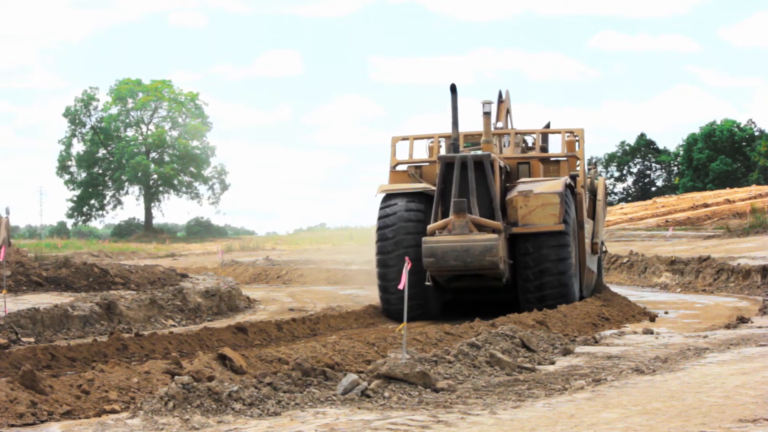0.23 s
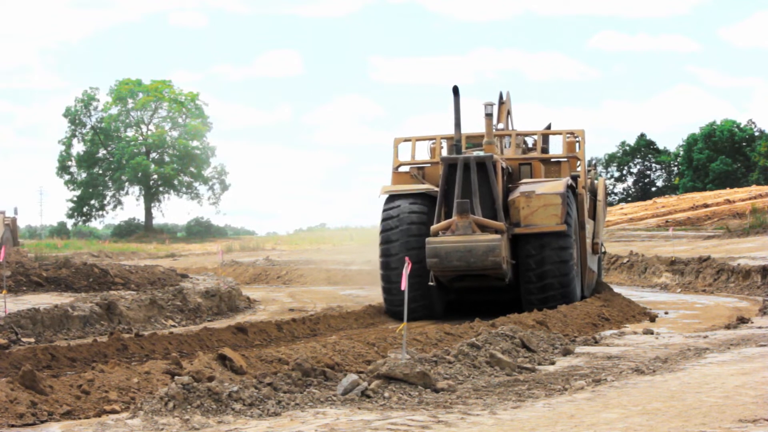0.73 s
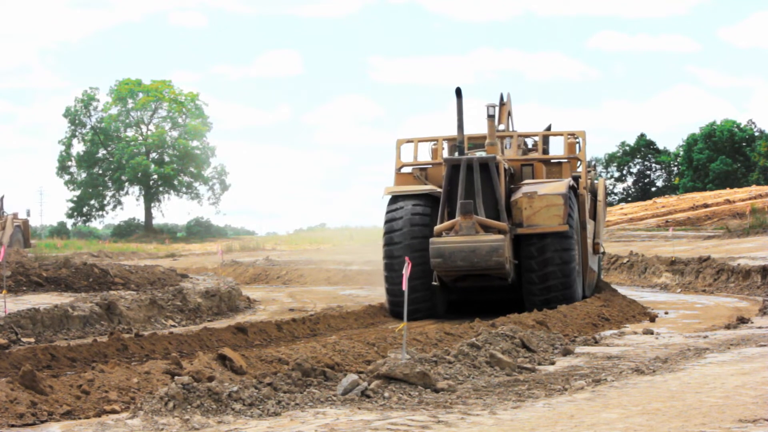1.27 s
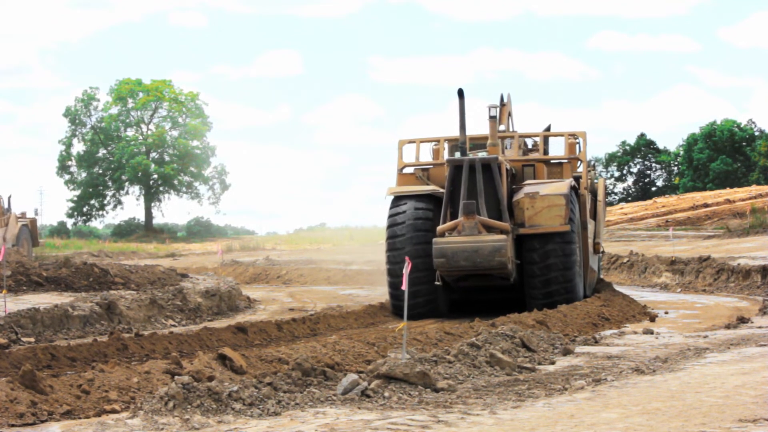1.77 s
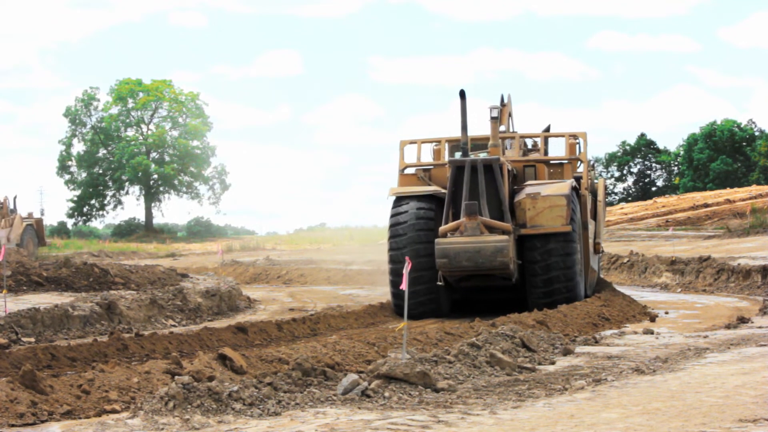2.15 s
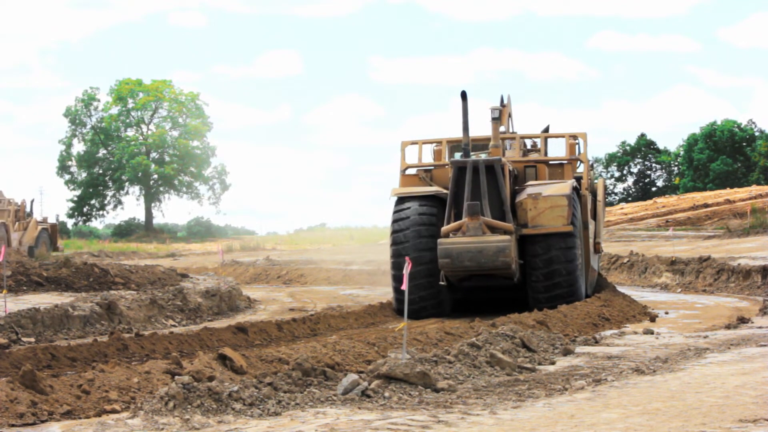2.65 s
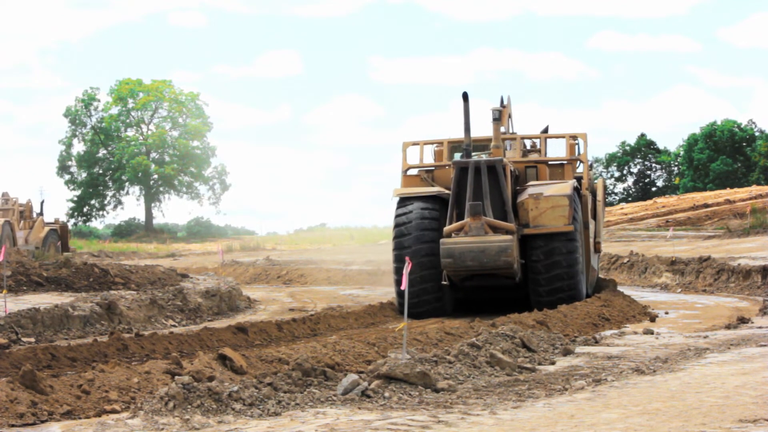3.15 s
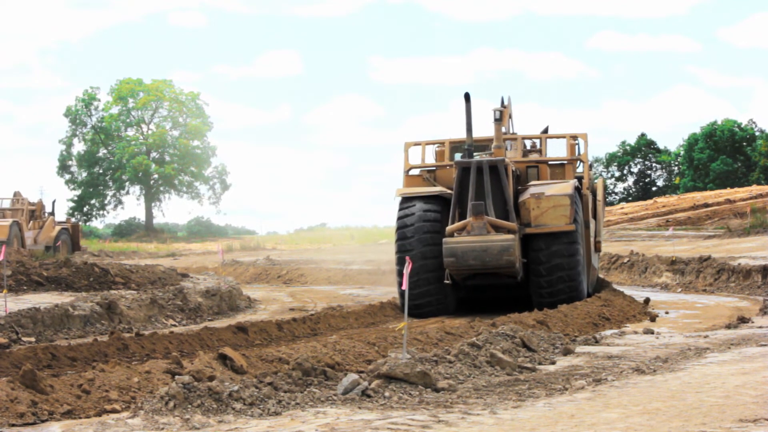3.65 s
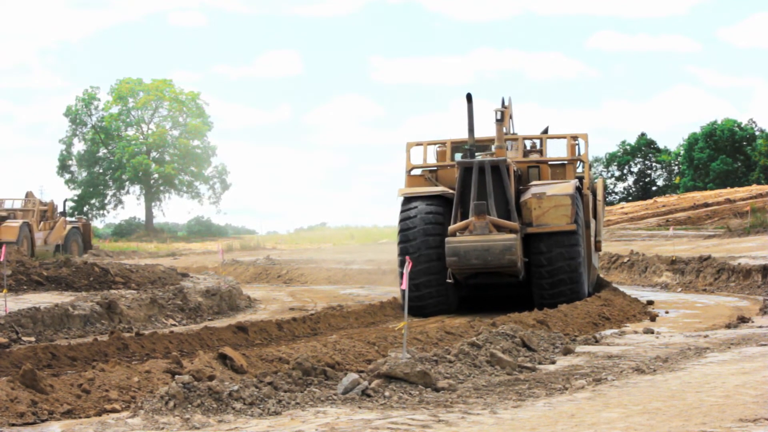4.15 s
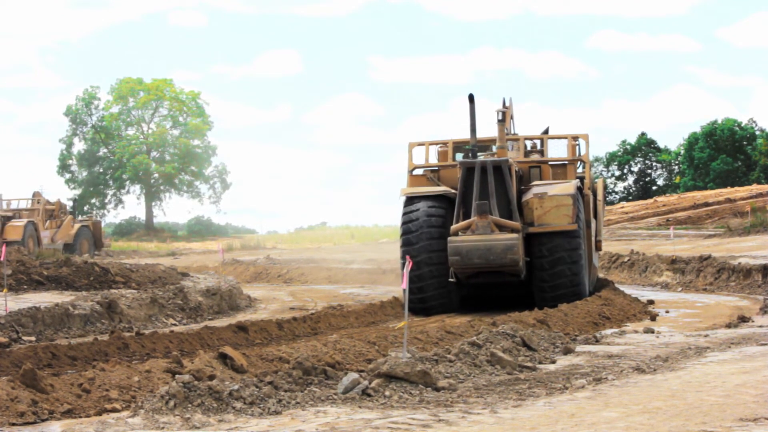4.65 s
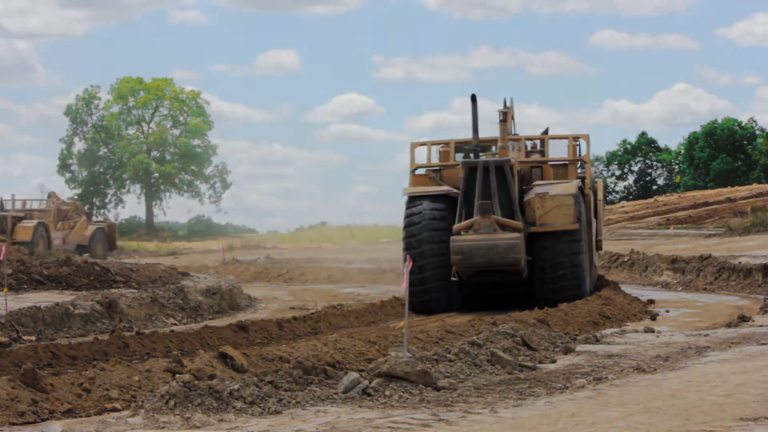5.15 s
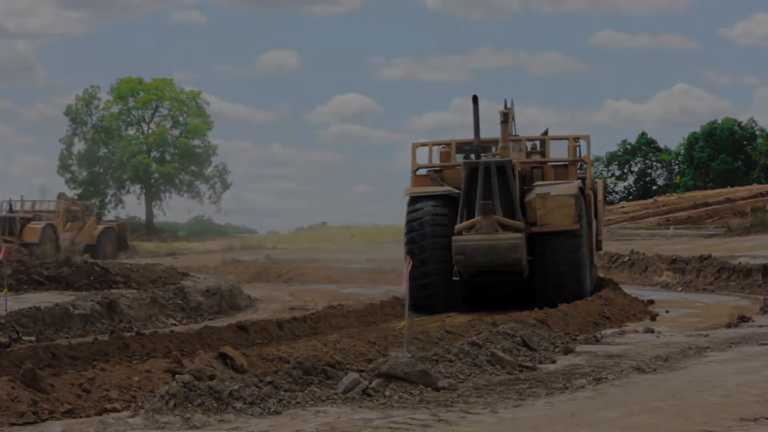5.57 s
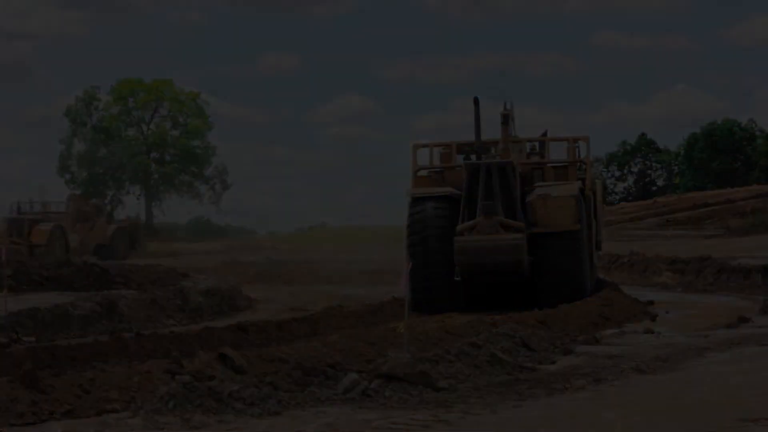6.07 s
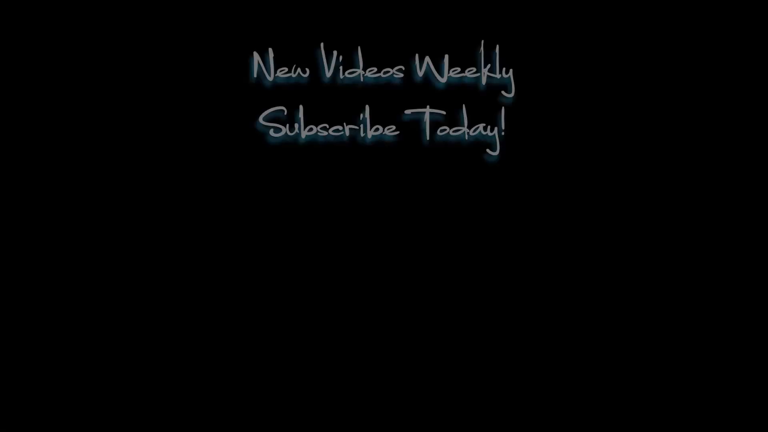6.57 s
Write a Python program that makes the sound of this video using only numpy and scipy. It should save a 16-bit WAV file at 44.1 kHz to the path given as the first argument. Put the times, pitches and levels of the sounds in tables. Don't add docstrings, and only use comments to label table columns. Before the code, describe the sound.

From 0 s a big diesel earthmover is already running at steady speed about twenty metres away in the open. A firm drone near 200 Hz carries rapid knocks, roughly seventeen a second, with mechanical valve rattle and a broad roar of fan, intake and tyres. Over it, bright gritty gas hiss flutters in uneven puffs, slightly hollow from ground reflection, brightening in short gusts, notably around 0.4, 1.3, 2.7 and 4.2 s. The drone swells briefly near 2 s. Further off, another engine's note sinks until about 2.3 s, climbs to about 3.9 s, dips near 5 s, then rises again; a third grumbles unsteadily behind. Around 3 s the roar and hiss ease slightly. From 4.6 s everything fades evenly together, engines still running, reaching silence near 6.4 s and remaining silent. The sound is mono, dense and slightly softened by the camera microphone.

```python
import sys
import numpy as np
from scipy import signal
from scipy.fft import rfft, irfft, next_fast_len
from scipy.io import wavfile
from scipy.ndimage import uniform_filter1d, map_coordinates

SR = 44100
rng = np.random.default_rng(int(sys.argv[2]) if len(sys.argv) > 2 else 0)


def file_out(sig):
    cols = np.atleast_2d(sig).T
    lim = np.clip(cols, -1, 1)
    pcm = np.round(lim * 32767).astype(np.int16)
    wavfile.write(sys.argv[1], SR, pcm)


def invert_db(x):
    u = np.asarray(x, float) / 20
    return 10 ** u


N = 300843
T = np.arange(N) / SR

# (time [s], gain [dB])
AIR = [(0, -1), (1.7, -1), (2.6, 3.5), (2.9, -1.5), (3.3, -0.4), (3.5, -3), (4.05, -2), (4.25, 5),
       (4.8, -1.5), (5.2, -1), (6.05, 2.5), (6.35, -0.5)]
BODY_SHARE, EDGE_SHARE = .15, .5


def level(x, db):
    return x * invert_db(db) / np.sqrt(np.mean(x ** 2))


def read(table):
    s, *columns = np.transpose(table)
    return [np.interp(T, s, c) for c in columns]


def walk(rate):
    hold = int(SR / rate)
    steps = np.repeat(rng.standard_normal(N // hold + 1), hold)
    smooth = uniform_filter1d(uniform_filter1d(steps, hold), hold)[:N]
    return smooth / smooth.std()


def colour(x, table):
    hz, db = np.transpose(table)
    size = next_fast_len(N)
    log_hz = np.log(np.fft.rfftfreq(size, 1 / SR) + 1)
    gain_db = np.interp(log_hz, np.log(hz), db, left=-60, right=-60)
    return irfft(rfft(x, size) * invert_db(gain_db), size)[:N]


def band(x, lo_hz, hi_hz):
    return signal.sosfilt(signal.butter(2, [lo_hz, hi_hz], "bandpass", fs=SR, output="sos"), x)


def lowpass(x, hz, order):
    return signal.sosfiltfilt(signal.butter(order, hz, fs=SR, output="sos"), x)


def air():
    # (time [s], half length [s], gain [dB])
    gusts = [(0.106, .06, 4), (0.427, .07, 7), (.58, .03, 4), (0.695, .05, 3), (0.947, .07, 3),
             (1.3, .04, 7.5), (1.49, .04, 4.5), (1.637, .05, 3), (1.962, .07, 3), (2.523, .05, 2.5),
             (2.728, .04, 4.5), (3.08, .06, 3.5), (3.33, .04, 1), (3.95, .06, 1.5), (4.687, .05, 2.5),
             (4.957, .05, 6), (5.235, .04, 4), (5.468, .05, 2), (5.63, .04, 1.5), (5.861, .05, 2.5)]
    return read(AIR)[0] + sum(db * np.exp(-.5 * ((T - s) / half) ** 2) for s, half, db in gusts)


def turned():
    return np.interp(T, (3, 3.05), (0, 1))


def engine_turns():
    # (time [s], speed [cycles/s])
    speed = [(.25, 16.823), (1.5, 16.832), (2.75, 16.862), (3.75, 16.834), (4.75, 16.812), (6.3, 16.815)]
    knock_turn = .238
    return np.cumsum(read(speed)[0]) / SR - knock_turn


def exhaust(turns, scatter=.095, lead=.07, lag=.55, breathe_db=.7):
    # (multiple of the cycle rate [-], level [dB rms])
    orders = [(6, -30.8), (10, -47.0), (12, -22.1), (13, -41.3), (14, -35.4), (15, -42.2), (16, -40.4),
              (17, -41.2), (18, -42.3), (19, -40.1), (20, -42.2), (22, -46.5), (23, -43.6), (24, -40.6),
              (25, -43.0), (26, -40.7), (27, -41.5), (29, -40.2), (30, -40.2), (31, -46.9), (32, -40.1),
              (33, -37.7), (35, -38.2), (36, -46.0), (47, -44.5), (48, -44.5), (49, -45.7), (51, -46.3),
              (53, -47.1), (54, -43.7),
              (4, -47.5), (38, -49), (41, -48), (57, -47), (60, -47.5), (66, -47.5), (68, -48), (73, -51),
             (88, -51), (110, -46.5)]
    # (time [s], level [dB rms])
    drone = [(0, -22), (1.15, -23), (1.32, -21), (1.6, -23.5), (1.98, -19), (2.2, -23.5), (2.45, -21),
             (3.2, -21), (6.3, -21.5)]
    pipe_order = 12
    out = 0
    for k, db in orders:
        if k > pipe_order:
            off = lead + scatter * max(1, k / 36) ** 4 * rng.standard_normal()
            off -= lag * np.exp(-(k - pipe_order) / 2.5)
        else:
            off = lead - .27 * (k < pipe_order)
        if k == pipe_order:
            db = read(drone)[0] - .6
        out = out + invert_db(db + breathe_db * walk(4)) * np.cos(2 * np.pi * (round(k) * turns + off))
    return np.sqrt(2) * out


def clatter(turns):
    size = 2048
    rattle = np.interp(turns % 1 * size, np.arange(size + 1), rng.standard_normal(size + 1))
    return level(band(rattle, 950, 2400), -37.5)


def puffs(turns, start=0.028, decay=0.44, uneven_db=1.5):
    puff_sizes = [1.5, 1.2, 3.8, 3.4, 1, 3.6]
    firing = (turns - start) * len(puff_sizes)
    n = np.floor(firing).astype(int)
    uneven = uneven_db * rng.standard_normal(n.max() + 9)[n + 8]
    size = np.array(puff_sizes)[n % len(puff_sizes)] + uneven
    return uniform_filter1d(size * np.exp(-(firing % 1) / decay), size=60)


def roar(puff_db, depth=0.3):
    # (frequency [Hz], level [dB per Hz])
    roar_tone = [(25, -34), (45, -16), (70, -11.5), (90, -8), (115, -2.7), (200, -3), (300, -4), (450, -9),
                 (580, -6), (660, -10), (800, -9), (1100, -8), (2000, -11), (3200, -16)]
    swell = .3 * walk(1.5)
    bands = 0
    for lo_hz in 20 * 2. ** np.arange(0, 8, .5):
        noise = band(rng.standard_normal(N), lo_hz, np.sqrt(2) * lo_hz)
        bands = bands + noise * invert_db(swell + .7 * walk(12))
    sag_db = -1.23 * turned()
    return level(colour(bands, roar_tone) * invert_db(depth * puff_db + sag_db), -24)


def grumble(flutter_db=3.0):
    # (frequency [Hz], width [Hz], level [dB rms])
    tones = [(118.8, 8.8, -41), (147.6, 3.5, -39), (170.5, 6, -37), (208.1, 21, -37)]
    out = 0
    for hz, width_hz, db in tones:
        phase = np.cumsum(hz + width_hz / 2 * walk(10)) / SR
        out = out + np.sqrt(2) * invert_db(db + flutter_db * walk(9)) * np.sin(2 * np.pi * phase)
    return out


def gas_noise(ticks_per_s=900, tick_db=-8):
    # (frequency [Hz], level [dB per Hz])
    treble = [(1530, -23.5), (2600, -5), (3300, 0.5), (4700, -2.5), (6000, -7), (7080, -13.5),
              (8340, -10.5), (9300, -21.5), (10400, -30), (12500, -35.5), (13700, -43.5), (14500, -35.5),
              (15200, -44.5), (15800, -52.5)]
    sizes = rng.standard_normal(N) * invert_db(3 * np.minimum(rng.exponential(size=N), 3))
    ticks = (rng.random(N) < ticks_per_s / SR) * sizes
    return colour(rng.standard_normal(N) + level(band(ticks, 9500, 17000), tick_db), treble)


def ground_echo(noise):
    spacing_hz = 1771 + 57 * T
    late = map_coordinates(noise, [np.arange(N) - SR / spacing_hz], order=3)
    late = lowpass(late, 9500, 2)
    share = .3 + .04 * read(AIR)[0]
    share = share * invert_db(2 * walk(4.1))
    return (noise - np.clip(share, 0, .9) * late) / np.sqrt(1 + share ** 2)


def hiss(puff_db, top_depth=1.4):
    air_db = air()
    top_db = -37.5 + air_db
    body_db = -31.0 + BODY_SHARE * air_db - 1.3 * turned()
    noise = ground_echo(gas_noise())
    low = lowpass(noise, 5800, 3)
    body = level(low * invert_db(0.89 * puff_db + 0.43 * walk(14)), 1.0)
    top = level((noise - low) * invert_db(top_depth * puff_db + .6 * walk(25)), .3)
    deep = lowpass(body, 3900, 2)
    edge_db = (EDGE_SHARE - BODY_SHARE) * air_db + .7 * walk(9)
    body = deep + (body - deep) * invert_db(edge_db)
    return body * invert_db(body_db) + top * invert_db(top_db)


def far_machine(wobble_hz=1.2, flutter_db=1.7):
    # (time [s], exhaust note [Hz])
    revs = [(0, 296), (.2, 296), (.4, 286), (.62, 295), (.95, 277), (1.15, 275), (1.4, 257), (1.7, 252),
            (2.3, 236), (2.9, 244), (3.25, 258), (3.45, 268), (3.9, 273), (4.35, 267), (4.7, 255),
            (5.2, 254), (5.6, 272), (6.3, 292)]
    hz = uniform_filter1d(read(revs)[0], size=4000)
    leaving_db = .3 * T
    idle_db = .8 * np.maximum(251 - hz, 0)
    db = -31.5 - leaving_db - idle_db
    phase = np.cumsum(hz + wobble_hz * walk(12)) / SR
    return np.sqrt(2) * invert_db(db + flutter_db * walk(14)) * np.sin(2 * np.pi * phase)


def site_floor():
    return level(band(rng.standard_normal(N), 9500, 15000), -64)


def scene():
    turns = engine_turns()
    puff_db = puffs(turns)
    scraper = exhaust(turns) + clatter(turns) + roar(puff_db) + hiss(puff_db)
    site = scraper + grumble() + far_machine() + site_floor()
    fade = np.interp(T, (4.6, 6.37), (1, 0))
    return (fade * site)[None]


def roll_off(x):
    return signal.sosfilt(signal.butter(12, 15660, fs=SR, output="sos"), x)


def record(dry):
    headroom, top_hz = .9, 15150
    soft = headroom * np.tanh(1.03 * dry / headroom)
    mix = signal.sosfilt(signal.butter(8, top_hz, fs=SR, output="sos"), soft)
    return roll_off(mix)


dry = scene()
out = record(dry)
file_out(out)
```